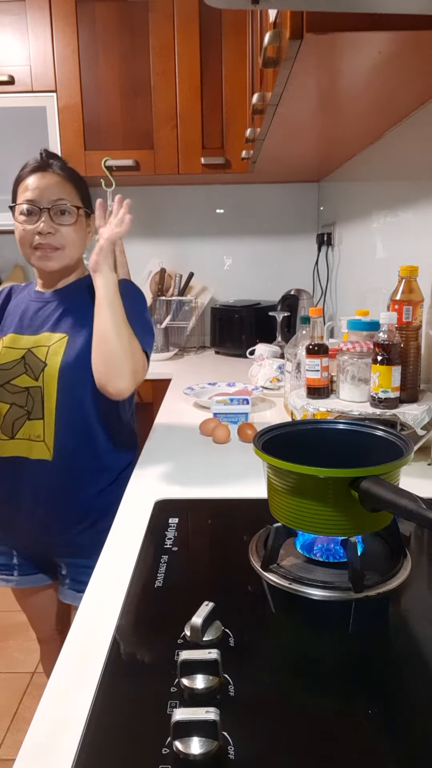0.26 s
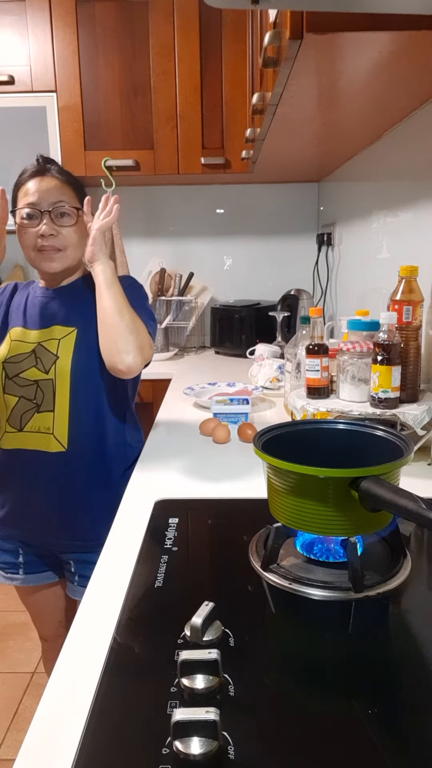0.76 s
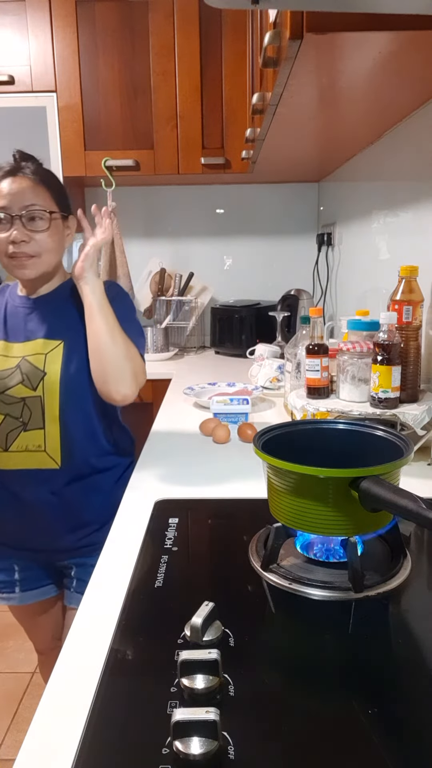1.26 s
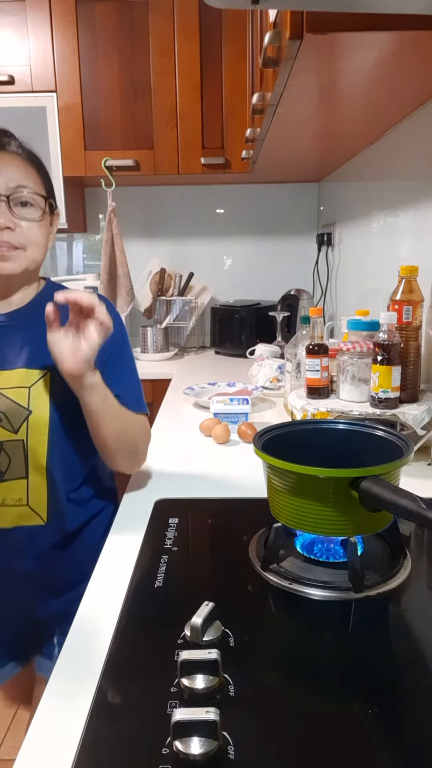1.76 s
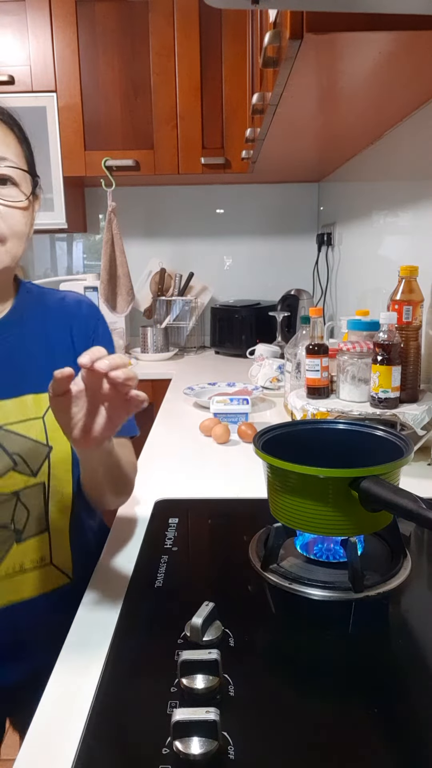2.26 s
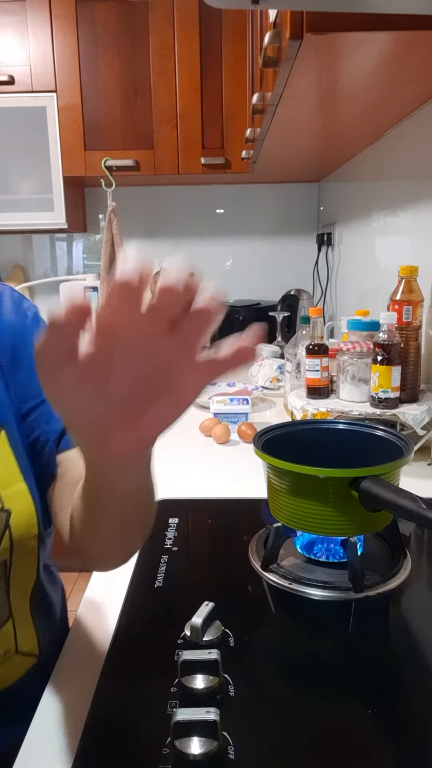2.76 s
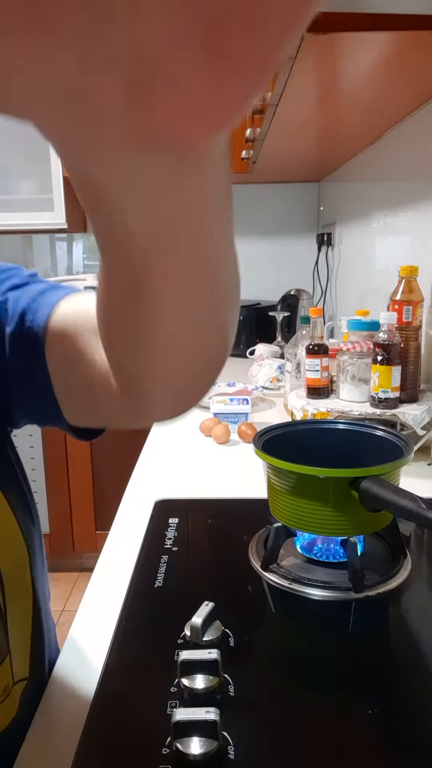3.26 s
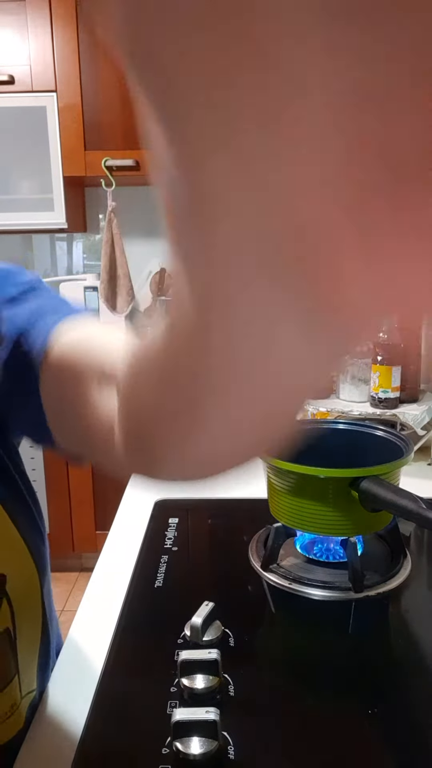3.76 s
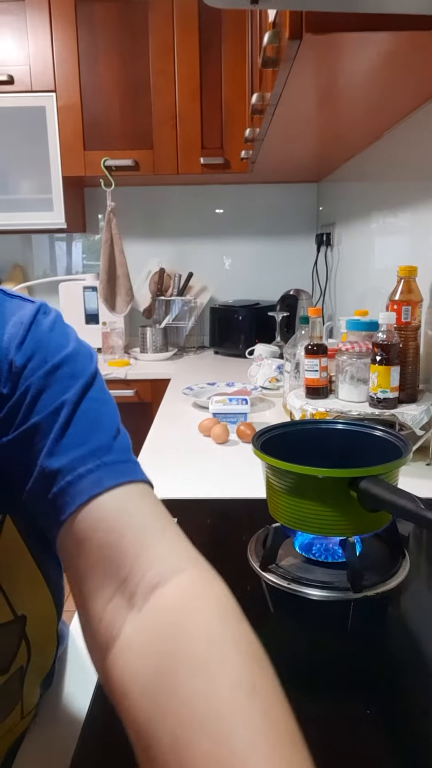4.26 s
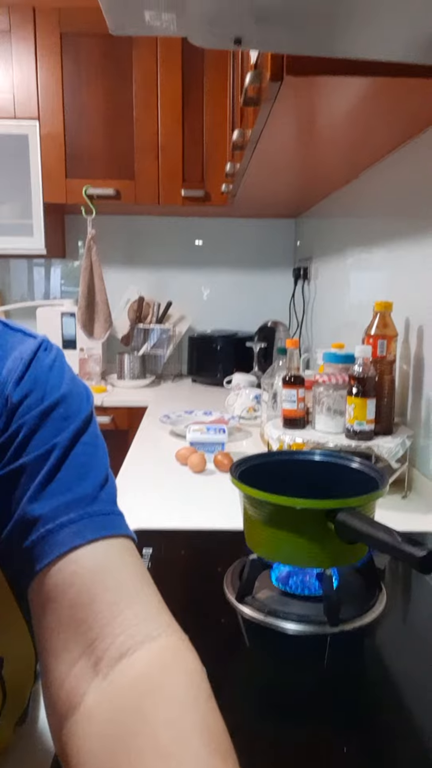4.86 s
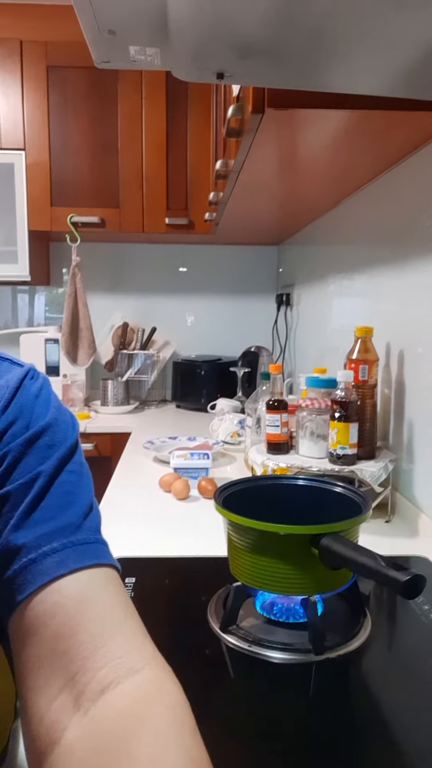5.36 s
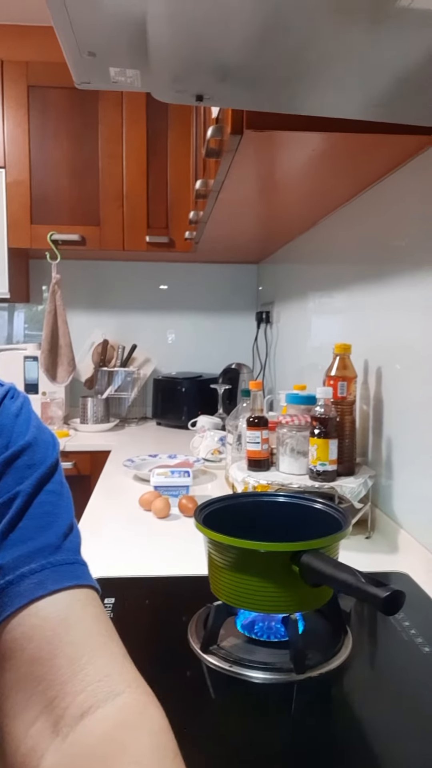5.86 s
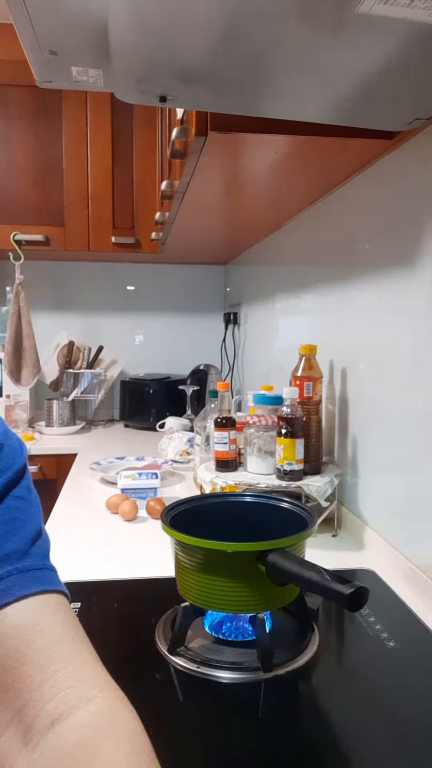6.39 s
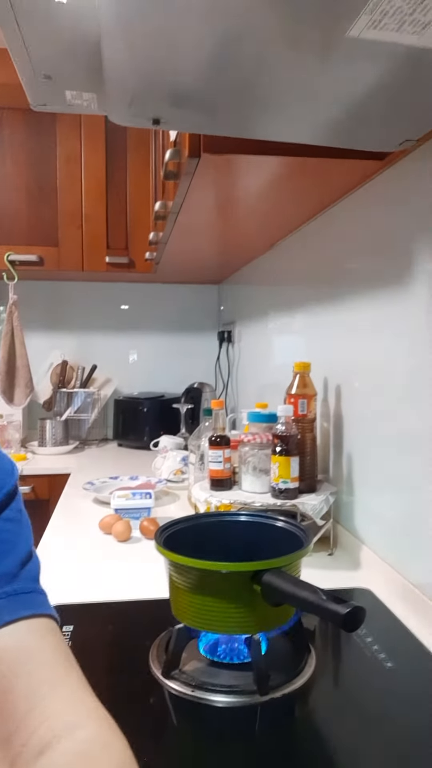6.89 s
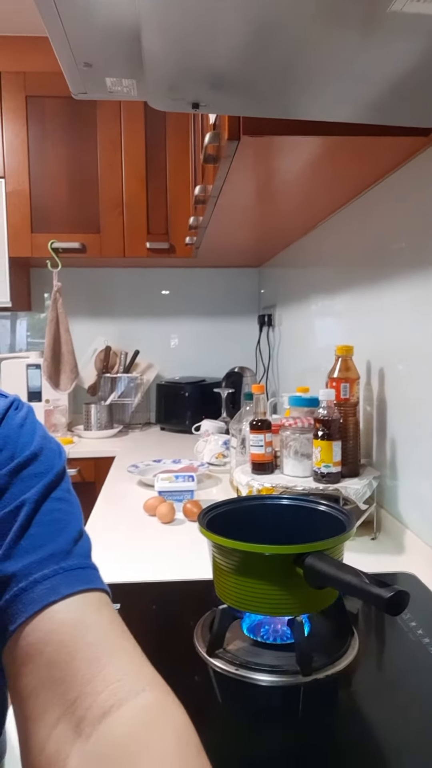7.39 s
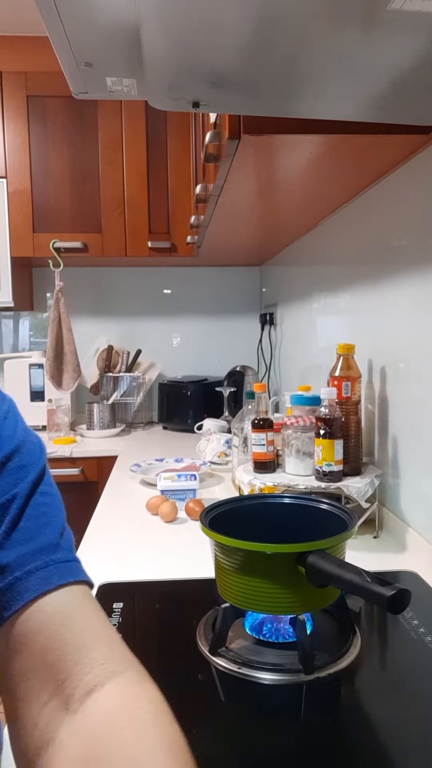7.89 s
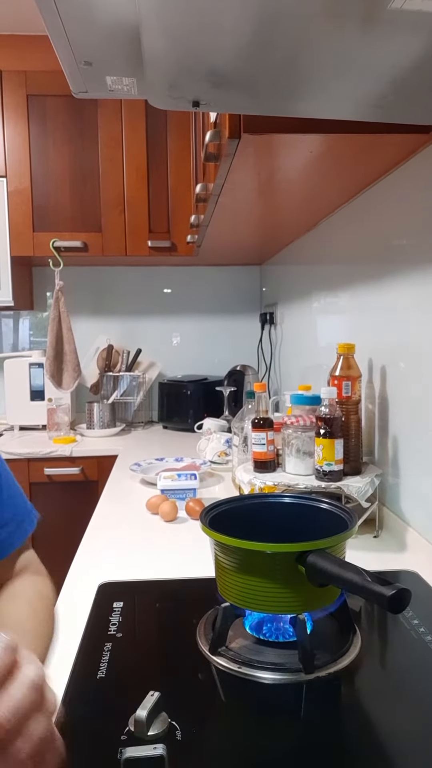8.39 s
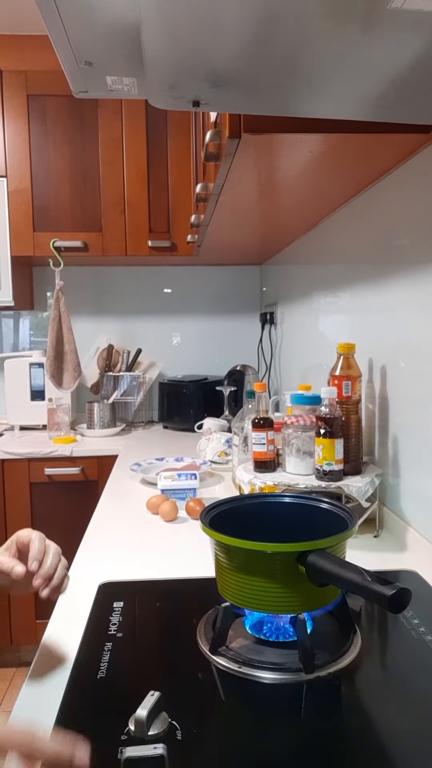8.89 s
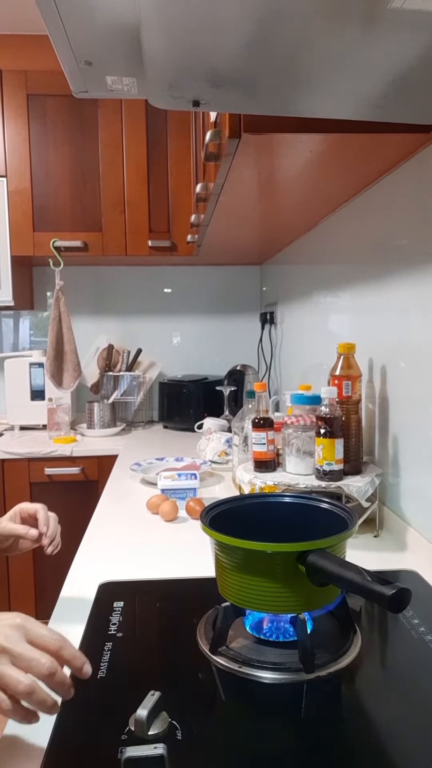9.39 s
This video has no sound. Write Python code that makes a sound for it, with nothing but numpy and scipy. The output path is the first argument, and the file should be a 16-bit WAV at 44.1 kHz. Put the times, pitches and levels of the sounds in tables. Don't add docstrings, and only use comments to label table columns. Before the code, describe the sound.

In a small tiled kitchen, an extractor hood drones without pause, a hollow low whir with airy rush, gas flame hiss and faint motor hum. Water spits sharply under a pot almost immediately. Midway, a plastic holder slips with a few crisp ticks, mostly on the left, as the phone microphone is tilted and the rush brightens, especially on the right; then it is set back and the sound dulls again.

```python
import sys
import numpy as np
from scipy import signal
from scipy.fft import rfft, irfft, next_fast_len
from scipy.io import wavfile
from scipy.ndimage import uniform_filter1d

SR = 44100
rng = np.random.default_rng(int(sys.argv[2]) if len(sys.argv) > 2 else 0)


def unload_audio(sound):
    columns = np.transpose(np.atleast_2d(sound))
    steps = np.round(np.clip(columns, -1, 1) * 32767)
    wavfile.write(sys.argv[1], SR, steps.astype(np.int16))


def gain_from_db(level_db):
    decades = np.asarray(level_db, float) / 20
    return 10 ** decades


N = 425124
EDGE_HZ = 15740


def read(points, hz):
    f, *columns = np.transpose(points)
    return np.array([np.interp(np.log(hz + 1), np.log(f + 1), column) for column in columns])


def evened(x):
    return x / np.sqrt(np.mean(x ** 2) + 1e-20)


def add(mix, start_s, sound):
    part = mix[:, round(start_s * SR):][:, :sound.shape[1]]
    part += sound[:, :part.shape[1]]


def resonate(x, hz, width_hz):
    pole = np.exp((2j * np.pi * hz - np.pi * width_hz) / SR)
    return 2 * signal.lfilter([1 - abs(pole)], [1, -pole], x).real


def fan(ripple_db=3.5, ripple_hz=34.87, turns=0.65, rumble_hz=45.):
    # (frequency [Hz], width [Hz], left level [dB per Hz], right level [dB per Hz])
    resonances = [(52, 17, -72.5, -84), (70, 25, -68, -78), (100.7, 19.6, -61, -65.5),
                  (119, 50, -66, -74.5), (152.4, 19, -63.5, -68), (177, 8, -66.5, -66),
                  (197.3, 11.6, -61, -64), (267, 31, -45, -49), (288.4, 31, -49, -50),
                  (311.4, 17.3, -43, -36.5), (342.4, 35, -51.5, -54.5), (362.6, 27, -60.5, -49.5),
                  (403.6, 33, -53, -58), (437, 23, -59.5, -68), (473.7, 18.6, -59, -61.5),
                  (492.8, 22, -57, -67), (540.7, 39, -60, -70), (546, 16, -82, -70), (599, 49, -68.5, -69),
                  (664, 10, -78, -82), (698, 74, -68.4, -70), (756, 67, -66.5, -77), (805, 90, -84, -100.0),
                  (866.5, 66, -62, -73.5), (924, 58, -67, -67.5), (1007, 56, -69.5, -68),
                  (1064, 105, -71, -68), (1083, 120, -67.5, -98.3), (1208, 62, -70.5, -96),
                  (1266, 16, -82, -92)]
    # (frequency [Hz], left level [dB per Hz], right level [dB per Hz])
    rush = [(60, -97, -97), (130, -96, -83), (1150, -76, -78.5), (1560, -73.5, -73), (1750, -76.5, -79),
            (2470, -81, -80.5), (3600, -81, -83), (3930, -79, -82), (4960, -82, -84), (5880, -90, -91),
            (7560, -92, -95), (10500, -88.5, -92.5), (12600, -90.5, -100), (15800, -96, -106)]
    # (frequency [Hz], left-right likeness [0-1], lead of the right [rad])
    ports = [(50, .98, .9), (265, .97, .25), (292, .95, .7), (302, .99, -.1), (325, .98, -.2),
             (345, .95, -.85), (430, .55, -1.), (470, .9, .1), (760, .62, -.4), (1080, .5, -2.2),
             (1230, .45, .8), (1600, .45, 3.), (2300, .4, 5.5), (5000, .25, 7.)]
    # (frequency [Hz], share of the ripple [0-1])
    combed = [(700, 0.), (1300, 1.), (2200, .9), (3200, .6), (9000, .35)]

    size = next_fast_len(N)
    hz = np.fft.rfftfreq(size, 1 / SR)
    power = gain_from_db(read(rush, hz)) ** 2

    knots = rng.standard_normal((3, 2000))
    knots[:2] -= uniform_filter1d(knots[:2], size=9, axis=1)
    ripple = np.array([np.interp(hz / ripple_hz, np.arange(2000), k) for k in knots])
    power *= gain_from_db(ripple_db * ripple[:2] * read(combed, hz)) ** 2

    low_hz = hz[:size // 16]
    for centre_hz, width_hz, left_db, right_db in resonances:
        peak = 1 / (1 + (2 * (low_hz - centre_hz) / width_hz) ** 2) ** 2
        power[:, :len(low_hz)] += gain_from_db([[left_db], [right_db]]) ** 2 * peak
    power *= (hz < EDGE_HZ) / (1 + (rumble_hz / (hz + 1)) ** 6)

    same, lead = read(ports, hz)
    same = np.clip(same, 0, 1)
    scramble = ripple[2] * np.clip(hz / 1600 - 1, 0, 1)
    lead = lead + 2 * np.pi * turns * uniform_filter1d(scramble, size=800)
    shared, separate = rfft(rng.standard_normal((2, size)))
    right = same * shared * np.exp(1j * lead) + np.sqrt(1 - same ** 2) * separate
    return irfft(np.array([shared, right]) * np.sqrt(power * SR / 2), size)[:, :N]


def exposed(x, patchy_db=0.21, flicker_db=0.11):
    # (time [s], tilt [0 rest - 1 tilted])
    tilting = [
        (0, 0.16),
        (3.2, 0.075),
        (3.45, 0.35),
        (4.45, 0.22),
        (4.75, 0.91),
        (7.15, 0.97),
        (7.4, 0.51),
        (7.85, -0.014),
        (9.64, -0.13),
    ]
    # (frequency [Hz], share of the exposure)
    shaded = [(500, 0.023), (1000, 0.78), (2000, 1.08), (5000, 1.12), (10000, 1.48), (15000, 0.92)]
    rest_db, tilted_db = [[0.84], [-1.1]], [[0.4], [4.]]
    reach_from_s, reach_to_s, reach_fade_s = 3.2, 4.4, .15
    reach_db, reach_hz = -1.5, 5500.

    hz, t, z = signal.stft(x, SR, nperseg=512, noverlap=384)
    tilt = np.interp(t, *np.transpose(tilting))
    shade_db = (rest_db + tilt * np.subtract(tilted_db, rest_db))[:, None]

    chance = rng.standard_normal((len(t), len(hz) + 1)).T
    drifting = uniform_filter1d(chance[1:], size=24, axis=1)
    patches = evened(uniform_filter1d(drifting, size=8, axis=0))
    flicker = evened(uniform_filter1d(chance[0], size=12))
    eddies_db = patchy_db * patches + flicker_db * flicker
    field_db = read(shaded, hz)[0][:, None] * (shade_db + eddies_db)

    near = np.clip(np.minimum(t - reach_from_s, reach_to_s - t) / reach_fade_s + .5, 0, 1)
    field_db[0] += reach_db * near / (1 + (reach_hz / (hz[:, None] + 1)) ** 4)
    return signal.istft(z * gain_from_db(field_db), SR, nperseg=512, noverlap=384)[1][:, :N]


def tick(ring_db, hz, crack_db, pan_db, noise):
    # (frequency [Hz], width [Hz], level [dB])
    shell = [(1220, 500, 4), (4060, 1300, -5), (5500, 4600, -7), (8400, 4600, 0.5), (13300, 4200, 2)]
    ring_cycles, longest_ring_s = 38., .032
    snap_db = 7.5

    t = np.arange(len(noise)) / SR
    t60 = min(ring_cycles / hz, longest_ring_s)

    def sine(f):
        return np.sin(2 * np.pi * f * t)

    crackle_decay = gain_from_db(-60 * t / 0.011) + gain_from_db(-27 - 60 * t / 0.04)
    burst = noise * np.minimum(t / 0.0002, 1) * crackle_decay
    burst -= gain_from_db(snap_db) * (abs(t - .0003) < .5 / SR)
    crack = sum(gain_from_db(db) * resonate(resonate(burst, f, width), f, width) for f, width, db in shell)

    ping = gain_from_db(-3.5 - 60 * t / 0.0087) * (sine(4050) + 0.59 * sine(4900))
    ring = gain_from_db(-60 * t / t60) * (sine(hz) + 0.25 * sine(.86 * hz) + 0.2 * sine(1.14 * hz))
    knock = gain_from_db(-6.5 - 60 * t / 0.03) * sine(640) * np.minimum(t / 0.0022, 1)
    body = (ring + ping * (hz > 1000)) * np.minimum(t / 0.0006, 1) + knock

    sound = -gain_from_db(ring_db) * body + gain_from_db(crack_db) * crack / abs(crack).max()
    sound = signal.sosfilt(signal.cheby2(10, 50, 16700, fs=SR, output="sos"), sound)
    return sound * gain_from_db([[min(pan_db, 0)], [min(-pan_db, 0)]])


def spit(db, t60, noise):
    t = np.arange(noise.shape[1]) / SR
    swell = noise * np.minimum(t / 0.0028, 1)
    thin = signal.sosfilt(signal.butter(5, 9300, "high", fs=SR, output="sos"), swell)
    thin = gain_from_db(db - 60 * t / t60) * thin
    thin = signal.sosfilt(signal.cheby2(14, 55, EDGE_HZ + 60, fs=SR, output="sos"), thin)
    dull = signal.sosfilt(signal.butter(3, 12000, fs=SR, output="sos"), thin)
    return np.array([0.72 * thin[0] + .4 * dull[0], gain_from_db(-2) * dull[1]])


def motor(waver=0.00866):
    # (frequency [Hz], left level [dB rms], right level [dB rms])
    hum = [(43.5, -68, -72), (49.2, -66, -67), (152.2, -57, -58)]
    drift = 1 + waver * evened(uniform_filter1d(rng.standard_normal(N), size=SR // 2))
    seconds = np.cumsum(drift) / SR
    tones = np.zeros((2, N))
    for hz, left_db, right_db in hum:
        tone = np.sqrt(2) * np.sin(2 * np.pi * (hz * seconds + rng.random()))
        tones += gain_from_db([[left_db], [right_db]]) * tone
    return tones


def scene():
    # (time [s], ring level [dB], ring frequency [Hz], crack level [dB], left over right [dB])
    ticks = [(4.3513, -45, 4200, -21, 22), (4.3546, -19, 1160, -21, 27), (4.573, -50, 2200, -38, 10),
             (5.359, -30, 2000, -44, 8), (5.712, -16.5, 2140, -20.5, 16), (6.0615, -20, 795, -36, 21),
             (6.062, -24, 2200, -50, 15), (6.8703, -13, 2180, -8.5, 18), (6.9615, -17.5, 2210, -18.5, 17),
             (7.153, -44, 2120, -44, 8), (7.165, -60, 2000, -33, -10), (7.2755, -28, 3020, -42, -12),
             (7.286, -60, 2000, -36, -12), (7.314, -60, 2000, -33, -12)]
    # (time [s], level [dB], decay by 60 dB [s])
    spits = [
        (.1065, -21, .03),
        (.111, -24, 0.045),
        (.121, -33, 0.083),
        (.134, -34, 0.27),
        (2.22, -44, .15),
        (6.1, -43, .15),
        (7.12, -44, .15),
    ]
    mix = exposed(fan()) + motor()
    for (start_s, *row), noise in zip(ticks, rng.standard_normal((len(ticks), 3000))):
        add(mix, start_s, tick(*row, noise))
    for (start_s, *row), noise in zip(spits, rng.standard_normal((len(spits), 2, 8000))):
        add(mix, start_s, spit(*row, noise))
    return mix


def top_cut(x):
    return signal.sosfilt(signal.butter(12, 16800, fs=SR, output="sos"), x)


def record(dry):
    # (frequency [Hz], level [dB per Hz])
    faintest = [(5000, -104), (6300, -97), (7500, -97.5), (10000, -99), (12000, -101.5), (14400, -104),
                (14500, -99.5), (16000, -99)]
    hz, t, z = signal.stft(dry, SR, "cosine", nperseg=2048, noverlap=1024, scaling="psd")
    power, hz = 2 * abs(z) ** 2, hz[:, None]
    blocks = power[:, :1024].reshape(2, 32, 32, -1).mean(axis=2).repeat(32, axis=1)
    wide = np.concatenate([blocks, power[:, 1024:]], axis=1)
    level = np.where(hz > 14470, wide, uniform_filter1d(power, size=9, axis=1))
    kept = (level > gain_from_db(read(faintest, hz)[0]) ** 2) | (hz < 5000)
    gated = signal.istft(z * kept, SR, "cosine", nperseg=2048, noverlap=1024, scaling="psd")[1][:, :N]
    return top_cut(gated)


dry = scene()
out = record(dry)
unload_audio(out)
```